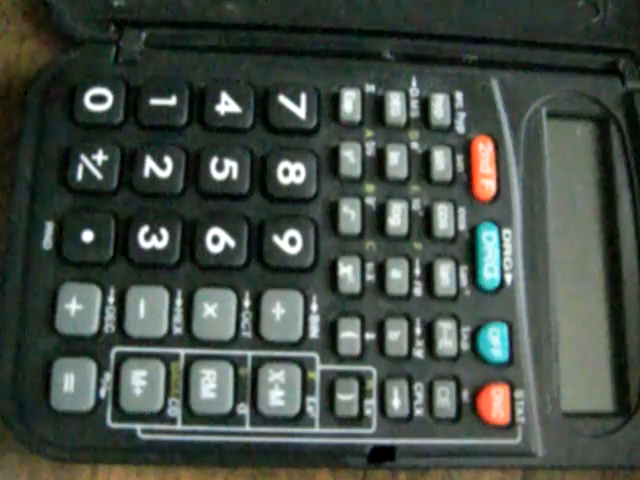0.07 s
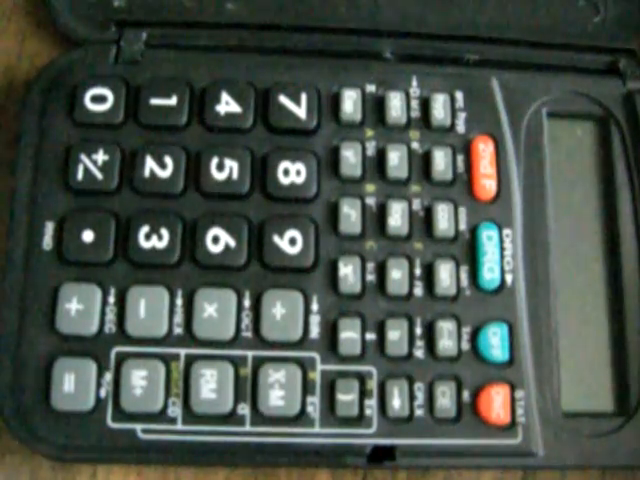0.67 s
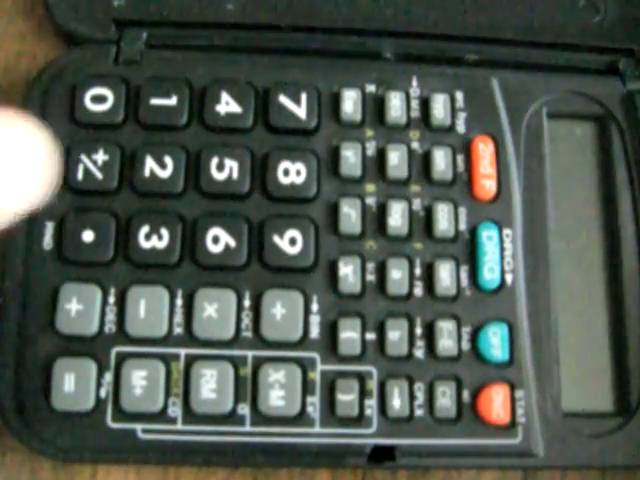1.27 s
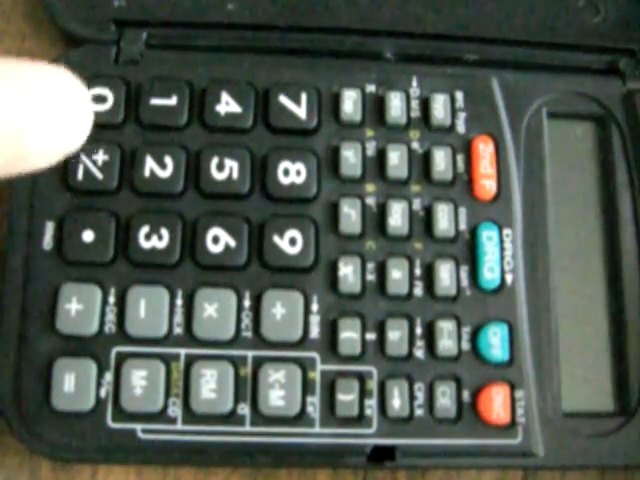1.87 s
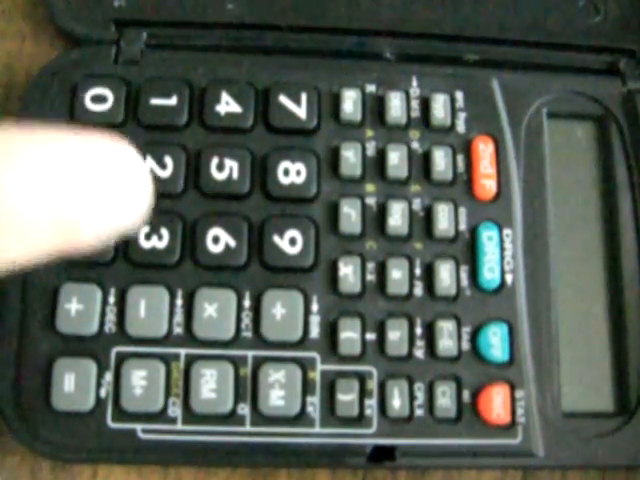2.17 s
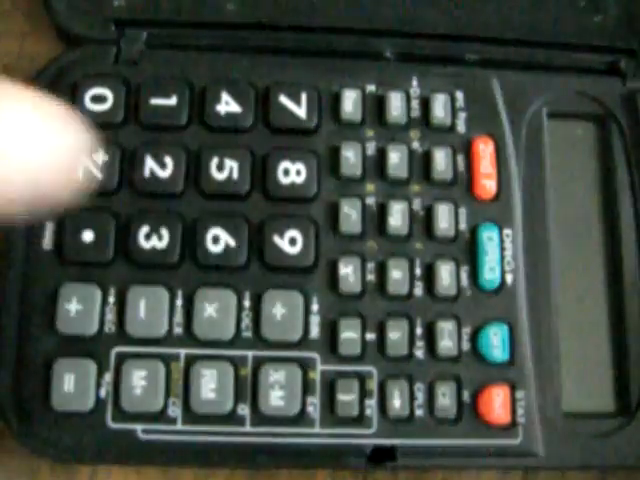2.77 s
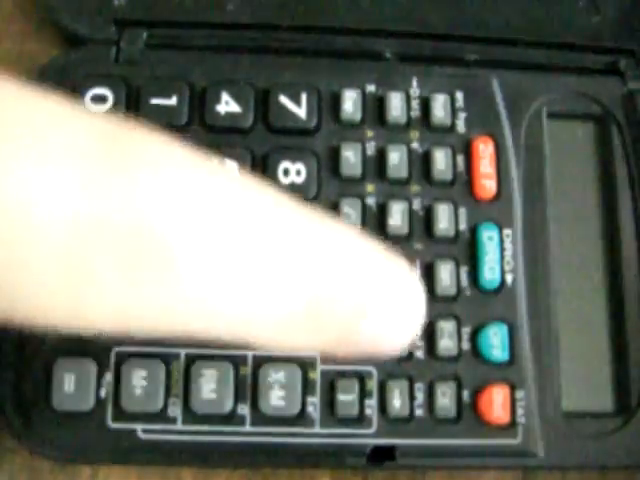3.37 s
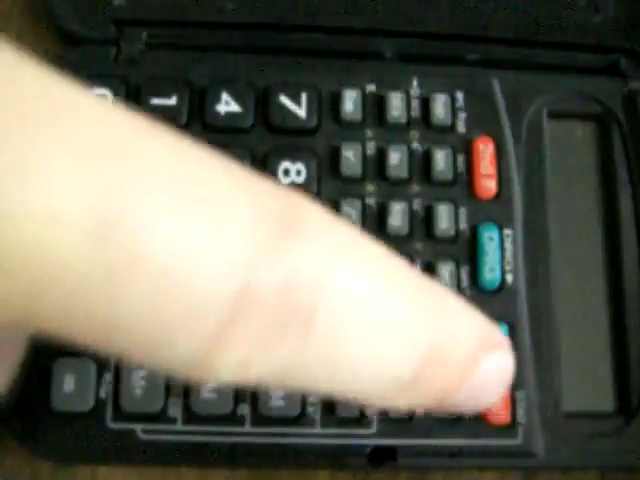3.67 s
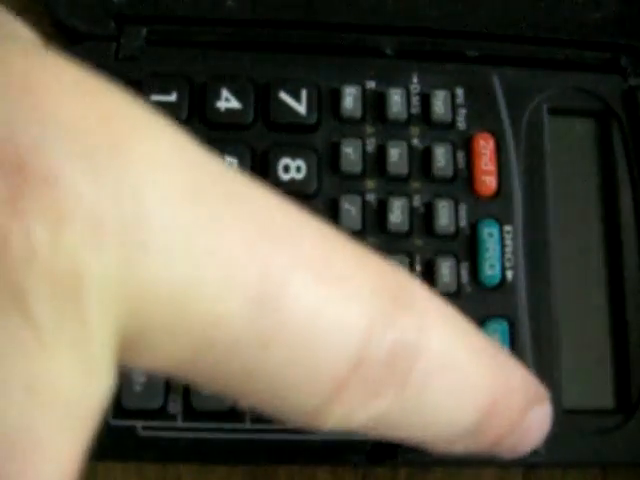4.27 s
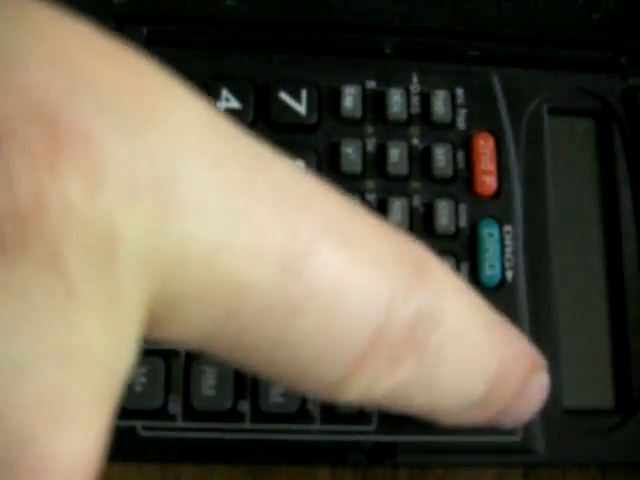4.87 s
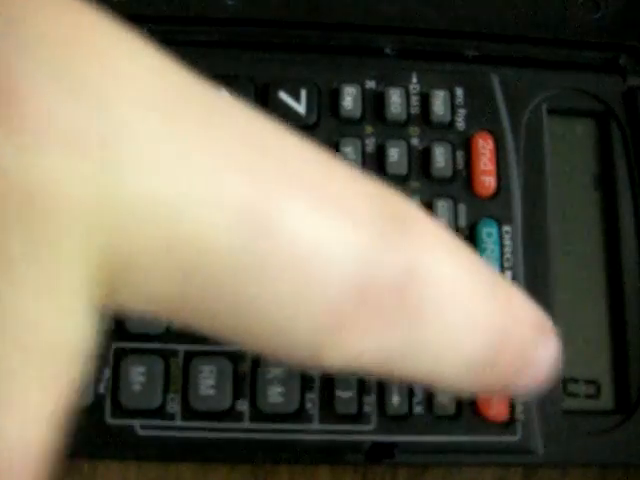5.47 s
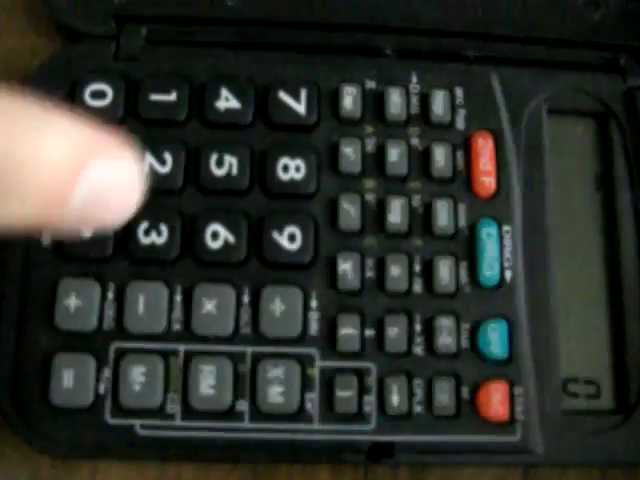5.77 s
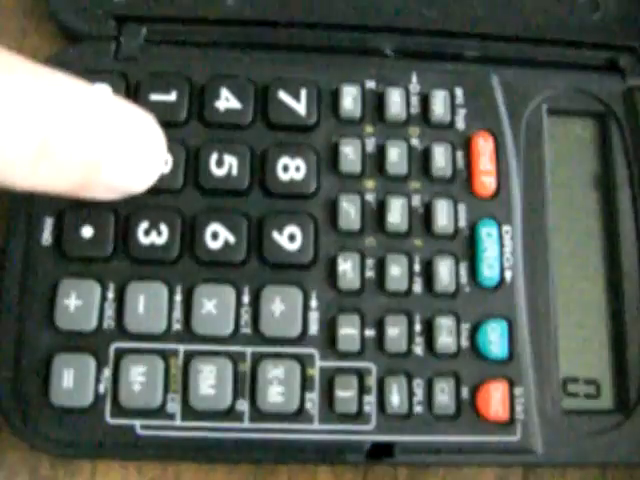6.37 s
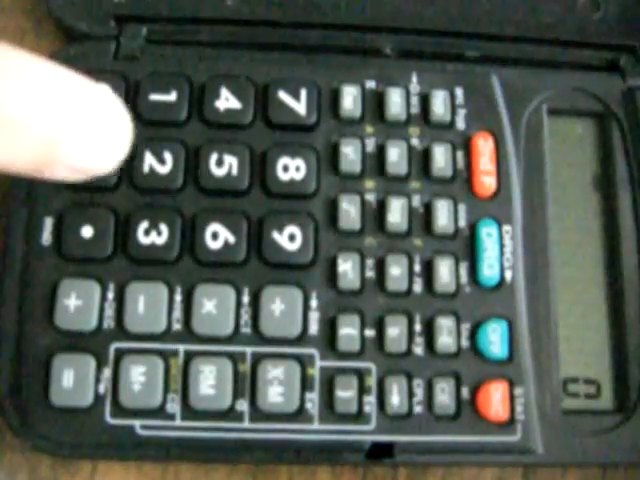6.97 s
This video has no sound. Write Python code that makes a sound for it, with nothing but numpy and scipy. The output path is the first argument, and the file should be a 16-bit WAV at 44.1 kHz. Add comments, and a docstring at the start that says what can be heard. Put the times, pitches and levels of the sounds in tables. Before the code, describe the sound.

In a quiet room, a desk takes one sudden thump that rings briefly and settles. After a pause with faint low handling noise and a barely audible sleeve, a fingertip works a pocket calculator near the microphone: a handful of small plastic ticks, the clearest coming in two groups past the middle. A steady, wide hiss with low rumble and a barely audible high whine lies underneath.

```python
"""A finger works the keys of a plastic pocket calculator: the caps tick against the case and the
fingertip rubs on them. Before that, a bump thuds through the desk, which rings, rocks and settles.
A sleeve rustles faintly as the hand moves, and low handling rumbles swell and fade.
Quiet room rumble, wide microphone hiss and a thin electronic whine fade in and then stay steady;
a brief high sizzle sounds near the start."""
import sys
import numpy as np
from scipy import signal
from scipy.fft import rfft, irfft
from scipy.io import wavfile
from scipy.ndimage import uniform_filter1d

SR = 44100
rng = np.random.default_rng(int(sys.argv[2]) if len(sys.argv) > 2 else 0)


def wav_record(signal):
    """Record a signal, one row per channel, as 16-bit PCM in the file named by sys.argv[1]."""
    frames = np.transpose(np.atleast_2d(signal))
    bounded = np.clip(frames, -1, 1)
    # unit amplitude maps onto the largest positive 16-bit level
    quanta = np.round(bounded * 32767).astype(np.int16)
    wavfile.write(sys.argv[1], SR, quanta)


N = 313551
T = np.arange(N) / SR
RING_SIZE = 24000  # samples given to one knock
RING_T = T[:RING_SIZE]
OPPOSED = np.array([[1], [-1]])  # adds a "side" sound to the left, takes it from the right: sounds wide
BACKGROUND_START_S = 0.135


# The notes a key cap and the case ring with. Each row: pitch in Hz, level in dB, seconds to fade 60 dB.
CAP_NOTES = [(1800, -6, 0.013), (2310, -2.5, 0.015), (2700, -4, 0.013), (3440, -1, 0.0086),
             (4460, -2, 0.0092), (5340, -3.5, 0.0078), (9300, -9.5, 0.0075)]
# The ticks of the keys. Each row: start in seconds, level in dB, pitch multiplier, treble cut-off in Hz,
# level of the sharp click in dB relative to the tick, number of bounces.
KEY_TICKS = [(3.098, -53.5, 1.2, 8950, -2, 0), (3.112, -54, 0.98, 9000, 1, 0),
             (4.1825, -48, 1.24, 8070, -20, 0), (4.2217, -32.5, 0.97, 8000, -10.5, 0),
             (4.2805, -51, 0.92, 9000, -10, 0), (4.2970, -48, 0.67, 4000, -8, 0),
             (4.3007, -36.5, 0.48, 1200, -18, 1), (4.3122, -51, 1.24, 9000, -8, 0),
             (4.896, -48, 1.5, 12000, 0, 0), (4.9213, -44, 0.92, 8000, -15, 0),
             (4.9980, -42, 0.88, 7000, -2.5, 0), (5.0015, -34, 0.953, 2290, -8, 2),
             (5.2547, -44.5, 0.98, 8030, -12, 0)]

def key_ticks(bounce_gap_s=0.00366, left_minus_right_db=-1):
    """A cap knocks on the case with a click and a short ring; some caps chatter as they snap back."""
    out = np.zeros((2, N))
    click_colour = [(500, 10.5), (2000, -16), (5000, 2), (9000, -10.0), (15000, -18)]
    for start, tick_db, pitch, contact_hz, click_db, count in KEY_TICKS:
        cap = undb(-3) * cut_bass(ring(CAP_NOTES, pitch), hz=900)  # so small a part gives off little bass
        for _, delay, db in bounces(tick_db, count, bounce_gap_s, gap_ratio=0.95, loss_db=-4):
            click = burst(click_colour, db=click_db, fade_s=0.0095)
            side = burst(click_colour, db=-13, fade_s=0.016)
            desk_echo = burst(KEY_HISS_COLOUR, db=-33, fade_s=0.13)
            tick = click + soften(cap + desk_echo + OPPOSED * side, contact_hz)
            add(out, start + delay, undb(db + OPPOSED * left_minus_right_db / 2) * tick)
    return out


# The hiss of a rubbed key, also used for a tick's echo. Each row: frequency in Hz, strength in dB.
KEY_HISS_COLOUR = [(500, -3), (1800, 0), (3300, 7), (4700, 2), (6000, -7), (15000, -27)]
# The rubs of the fingertip. Each row: middle in seconds, rough length in seconds, level in dB.
FINGER_RUBS = [(3.112, 0.027, -61), (4.305, 0.057, -67), (4.478, 0.069, -64.5), (4.632, 0.021, -65),
               (4.755, 0.066, -72.5), (4.928, 0.012, -66), (5.236, 0.015, -62.5)]

def fingertip_rubs():
    """The fingertip drags on a key in short, grainy rubs."""
    loudness = sum(undb(db) * np.exp(-2 * ((T - middle) / length) ** 2)
                   for middle, length, db in FINGER_RUBS)
    return loudness * friction(KEY_HISS_COLOUR, grain_db=1.5, side_db=-6)


# The notes the desk rings with. Each row: pitch in Hz, level in dB, seconds to fade 60 dB.
DESK_NOTES = [(42.7, -30.5, 0.89), (101, -28, 0.26), (144.7, -27.5, 0.41), (204.4, -22, 0.25),
              (312.5, -6.5, 0.092), (371, -11, 0.15), (444.5, -10.5, 0.098), (539, -14, 0.2),
              (587.6, -22.5, 0.24), (638, -16.5, 0.15), (722, -24, 0.19), (764, -16.5, 0.13),
              (906, -22, 0.17), (1253, -27.5, 0.21), (1960, -19, 0.11), (2050, -27, 0.21),
              (3594, -19.5, 0.078)]
# The desk's crowded overtones and loose parts. Each row: frequency in Hz, strength in dB.
RATTLE_COLOUR = [(40, -19), (130, -2), (400, -4), (720, -5.5), (950, -14.5), (1550, -14.5), (2000, -10),
                 (2300, -13.5), (3700, -18), (5400, -24), (8000, -34.5), (15000, -46)]
# The blows on the desk. Each row: start in seconds, level in dB, treble cut-off in Hz (low is a soft
# blow), number of bounces.
DESK_BLOWS = [(0.574, -46, 4500, 0), (0.587, -35.5, 190, 0), (0.850, -45, 496, 0), (0.873, -43, 600, 0),
              (0.9221, -17.5, 1000, 0), (0.9275, -17.5, 2900, 0), (0.9360, -22.5, 6600, 3),
              (1.203, -41, 600, 0), (3.305, -31.5, 210, 0), (3.322, -47, 1200, 0), (3.606, -47, 1200, 0),
              (5.003, -27, 110, 0)]

def desk_bumps(bounce_gap_s=0.0098):
    """Each blow rings the desk, shakes its loose parts with a faint crack and echoes dully in the room."""
    out = np.zeros((2, N))
    ringing = ring(DESK_NOTES)
    attack = 1 - np.exp(-RING_T / 0.00031)
    side_colour = [(200, -13), (2000, -5), (4500, -1), (9000, -15)]  # left and right differ most in treble
    for start, blow_db, blow_hz, count in DESK_BLOWS:
        # a hard blow rocks the desk: each bounce takes longer and is weaker and duller
        for bounce, delay, db in bounces(blow_db, count, bounce_gap_s, gap_ratio=1.85, loss_db=-3.5):
            contact_hz = blow_hz * 0.48 ** bounce
            rattle = burst(RATTLE_COLOUR, db=-12, fade_s=0.22)
            room_echo = undb(-29) * decay(fade_s=0.7) * soften(noise(RATTLE_COLOUR, RING_SIZE), hz=1200)
            side = burst(side_colour, db=-26, fade_s=0.28)
            crack = undb(-46) * decay(fade_s=0.15) * rng.standard_normal((2, RING_SIZE))
            thud = soften(ringing + attack * (rattle + room_echo + OPPOSED * side), contact_hz)
            add(out, start + delay, undb(db) * (thud + attack * crack))
    return out


# The hiss of a sliding sleeve. Each row: frequency in Hz, strength in dB.
SLEEVE_COLOUR = [(100, -1), (500, 9.5), (900, 10.5), (1300, 5.5), (2000, 5.5), (4000, -2), (8000, -7.5),
                 (11000, -10), (15000, -17)]
# The strokes of the hand. Each row: fastest moment in seconds, rise in seconds, fall in seconds,
# level in dB, treble cut-off in Hz (a higher cut-off gives a brighter rustle).
HAND_STROKES = [(1.08, 0.089, 0.07, -62, 11000), (1.24, 0.084, 0.1, -60.3, 8000),
                (1.49, 0.02, 0.06, -66, 8000), (2.81, 0.13, 0.1, -61.5, 14000),
                (3.32, 0.18, 0.095, -62, 9000), (5.80, 0.29, 0.06, -62.5, 14000)]

def sleeve_rustle():
    """The sleeve slides as the hand comes and goes."""
    sliding = friction(SLEEVE_COLOUR, grain_db=1.3, side_db=-12)
    return sum(undb(db) * swell(peak, rise, fall) * soften(sliding, top_hz)
               for peak, rise, fall, db, top_hz in HAND_STROKES)


# The dull tone of the handling rumble. Each row: frequency in Hz, strength in dB.
RUMBLE_COLOUR = [(20, 15), (60, -10), (110, 2), (200, -2.5), (380, -0.5), (600, -29), (1500, -38),
                 (6000, -65)]
# The handling rumbles. Each row: strongest moment in seconds, rise in seconds, fall in seconds,
# level in dB, bass cut-off in Hz.
HANDLING_RUMBLES = [(0.16, 0.1, 0.43, -68, 10), (1.2, 0.22, 0.27, -52, 16), (1.97, 0.15, 0.11, -52.5, 72),
                    (2.19, 0.097, 0.06, -52.5, 70), (6.4, 0.4, 0.35, -59, 10)]

def handling_rumbles():
    """Low handling rumbles swell and fade; the two near 2 seconds lack the deepest bass."""
    rumble = noise(RUMBLE_COLOUR)
    return sum(undb(db) * swell(peak, rise, fall) * cut_bass(rumble, low_hz)
               for peak, rise, fall, db, low_hz in HANDLING_RUMBLES)


# The tone of the high sizzle. Each row: frequency in Hz, strength in dB.
HIGH_SIZZLE_COLOUR = [(1000, -37), (2800, -3), (4000, -5), (4900, 1), (5700, 1.5), (6600, 5), (8000, -1),
                      (10000, 1.5), (12500, -8), (15500, -4)]

def sizzle():
    """A short, wide, high hiss swells and stops dead."""
    gate = switch_on(0.198, ramp_s=0.015) - switch_on(0.452, ramp_s=0.003)
    loudness = undb(-65) * gate * swell(peak_s=0.37, rise_s=0.17, fall_s=0.15)
    side = noise(HIGH_SIZZLE_COLOUR)
    middle = undb(-6) * noise(HIGH_SIZZLE_COLOUR)
    return loudness * (middle + OPPOSED * side)


# The background noise that left and right share. Each row: frequency in Hz, strength in dB.
ROOM_MIDDLE_COLOUR = [(20, -0.5), (45, 0.5), (75, -1), (200, -3.5), (370, -5.5), (600, -9.5), (850, -12),
                      (1300, -18), (2200, -22), (2700, -24.5), (4500, -26.5), (7000, -31), (11000, -34.5),
                      (15500, -38.5)]
# The background noise that makes it wide. Each row: frequency in Hz, strength in dB.
ROOM_SIDE_COLOUR = [(20, 5), (90, 1.5), (250, -1), (500, -4.5), (900, -7), (1400, -9.5), (3000, -12.5),
                    (7000, -17), (12000, -20), (15500, -21.5)]

def room_noise(level_db=-57.5, waver_db=0.47):
    """Low room rumble wavers a little under wide microphone hiss."""
    waver = signal.resample(rng.standard_normal(size=70), N)
    middle = undb(level_db + waver_db * waver) * noise(ROOM_MIDDLE_COLOUR)
    side = undb(level_db) * noise(ROOM_SIDE_COLOUR)
    return middle + OPPOSED * side


# The tones of the whine. Each entry: pitch in Hz.
WHINE_PITCHES = [4737, 12800, 15256, 15601, 15735]
# How loud those tones are. Each row: level in the middle in dB, level at the sides in dB.
WHINE_LEVELS = [(-86.5, -84), (-87, -81), (-91, -84), (-85, -76), (-88, -88)]

def electronic_whine(lowest_start_s=2.4):
    """Electronics give off thin, steady tones; the lowest joins late."""
    out = np.zeros((2, N))
    for hz, (middle_db, side_db) in zip(WHINE_PITCHES, WHINE_LEVELS):
        phase = 2 * np.pi * (hz * T + rng.random())
        gate = switch_on(lowest_start_s, ramp_s=0.2) if hz == min(WHINE_PITCHES) else 1
        tone = undb(middle_db) * np.sin(phase) + OPPOSED * undb(side_db) * np.cos(phase)
        out += np.sqrt(2) * gate * tone
    return out


def friction(colour, grain_db, side_db):
    """Sliding surfaces hiss, catching and slipping every few milliseconds."""
    roughness = uniform_filter1d(rng.standard_normal(N), size=180)
    grip = undb(grain_db * roughness / roughness.std())
    grip /= np.sqrt(np.mean(grip ** 2))
    return grip * (noise(colour) + undb(side_db) * OPPOSED * noise(colour))


def bounces(db, count, gap_s, gap_ratio, loss_db):
    """A blow and its bounces, each as its number, delay in seconds and level in dB."""
    delay = 0
    for bounce in range(count + 1):
        yield bounce, delay, db + bounce * loss_db
        delay += gap_s * gap_ratio ** bounce


def ring(notes, pitch=1):
    """A struck object rings with fading notes; neighbouring notes swing in opposite directions."""
    return sum((-1) ** k * undb(db) * decay(fade_s) * np.sin(2 * np.pi * hz * pitch * RING_T)
               for k, (hz, db, fade_s) in enumerate(notes))


def noise(colour, size=N):
    """Noise of average strength 1; its colour says how strong the frequencies are next to each other."""
    hz, db = np.transpose(colour)
    frequencies = np.maximum(np.fft.rfftfreq(size, 1 / SR), 1)
    gains = undb(np.interp(np.log(frequencies), np.log(hz), db))
    hiss = irfft(rfft(rng.standard_normal(size)) * gains, size)
    return hiss / hiss.std()


def burst(colour, db, fade_s):
    """A puff of noise that starts at once and dies away."""
    return undb(db) * decay(fade_s) * noise(colour, RING_SIZE)


def decay(fade_s):
    """A loudness curve that drops 60 dB in fade_s seconds."""
    return np.exp(-np.minimum(np.log(1000) * RING_T / fade_s, 20))


def swell(peak_s, rise_s, fall_s):
    """A loudness curve that grows, peaks and dies away."""
    width_s = np.where(T < peak_s, rise_s, fall_s)
    return np.exp(-np.minimum(((T - peak_s) / width_s) ** 2, 30))


def switch_on(start_s, ramp_s):
    """A loudness curve that climbs from 0 to 1 and stays there."""
    return np.clip((T - start_s) / ramp_s, 0, 1)


def soften(sound, hz):
    """Turn down the treble above hz, as a soft contact does."""
    return signal.sosfilt(signal.butter(2, min(hz, SR / 3), fs=SR, output="sos"), sound)


def cut_bass(sound, hz):
    """Turn down the bass below hz."""
    return signal.sosfilt(signal.butter(2, hz, "highpass", fs=SR, output="sos"), sound)


def undb(db):
    """Turn decibels into a multiplier."""
    return 10 ** (np.asarray(db) / 20)


def add(out, start_s, sound):
    """Mix a sound in at its start time."""
    first = int(start_s * SR)
    out[:, first:first + sound.shape[-1]] += sound[..., :N - first]


def scene(fade_depth_db=-14.5, fade_halfway_s=0.65):
    """Desk, keys and hand play over a background that starts softly and rises to a steady level."""
    foreground = desk_bumps() + key_ticks() + sleeve_rustle() + fingertip_rubs()
    fade_in = undb(fade_depth_db / (1 + (T / fade_halfway_s) ** 4.5))  # an S-shaped curve
    background = handling_rumbles() + fade_in * (room_noise() + electronic_whine())
    return foreground + sizzle() + switch_on(BACKGROUND_START_S, ramp_s=0.001) * background


def record(dry):
    """The very highest treble is cut off steeply."""
    top_hz = 15800
    return signal.sosfilt(signal.ellip(10, .2, 70, top_hz, fs=SR, output="sos"), dry)


dry = scene()
out = record(dry)
wav_record(out)
```